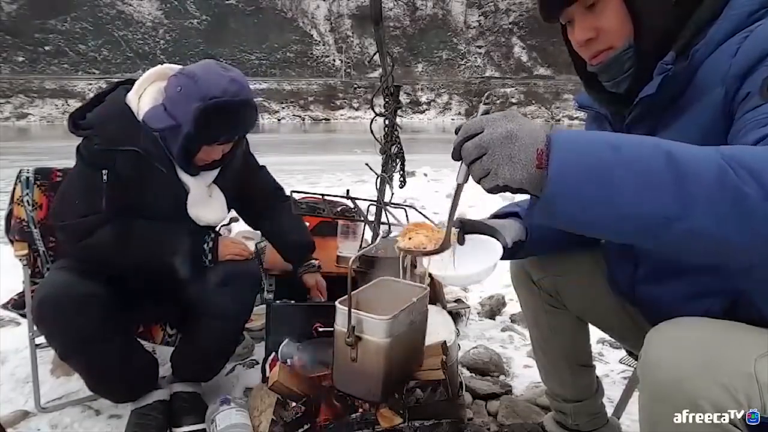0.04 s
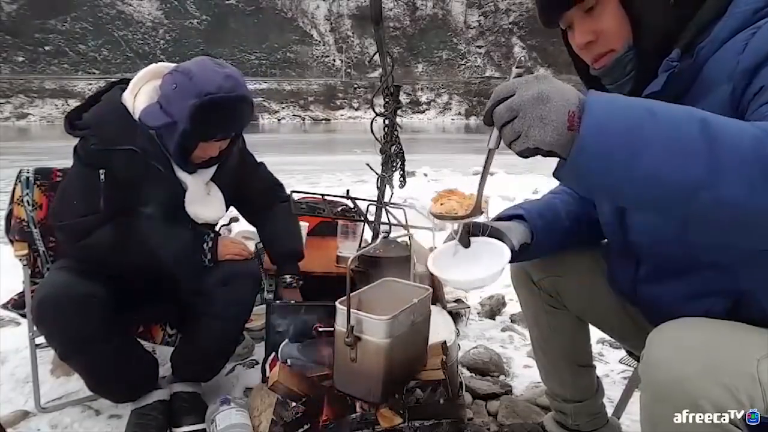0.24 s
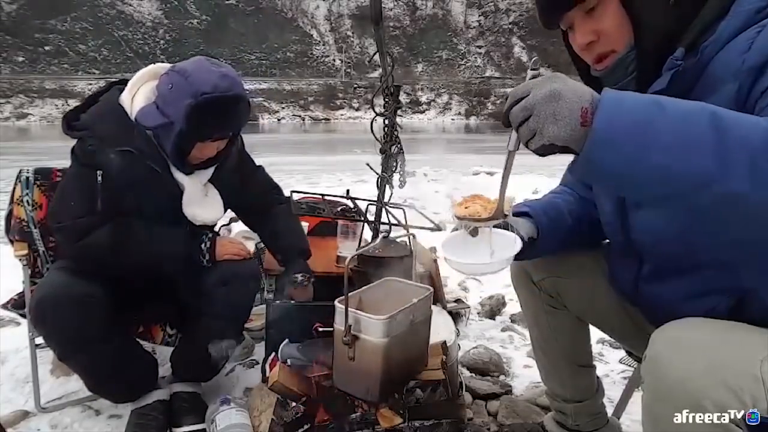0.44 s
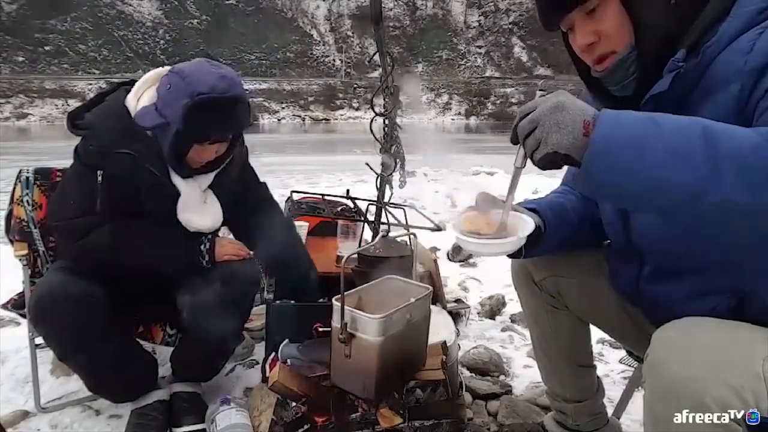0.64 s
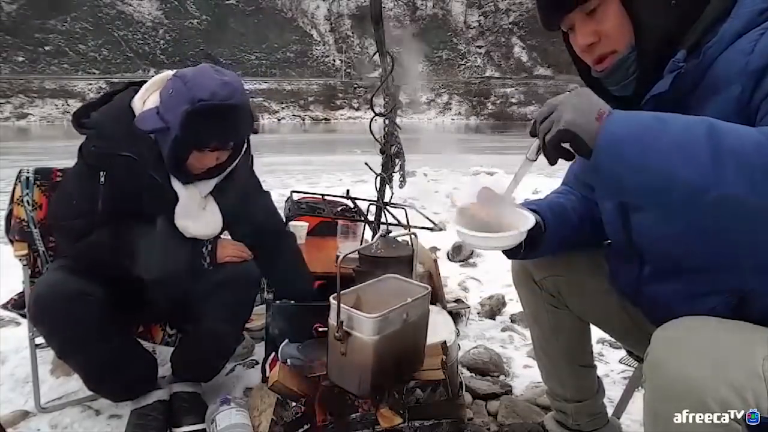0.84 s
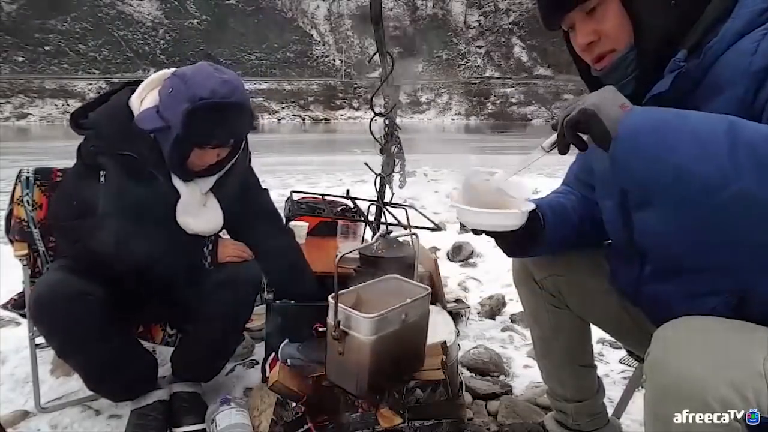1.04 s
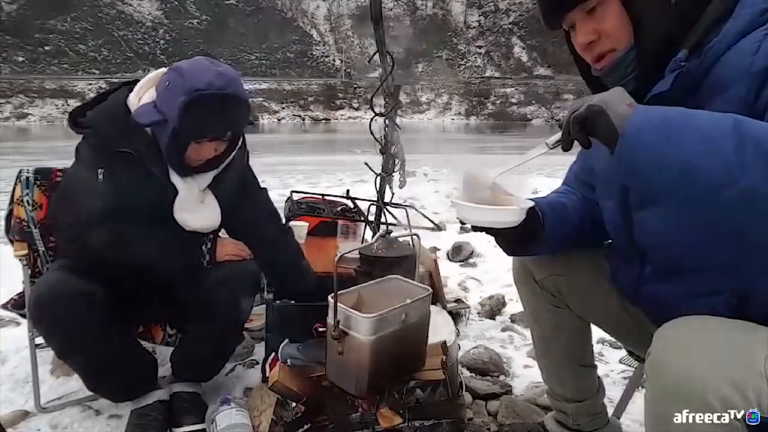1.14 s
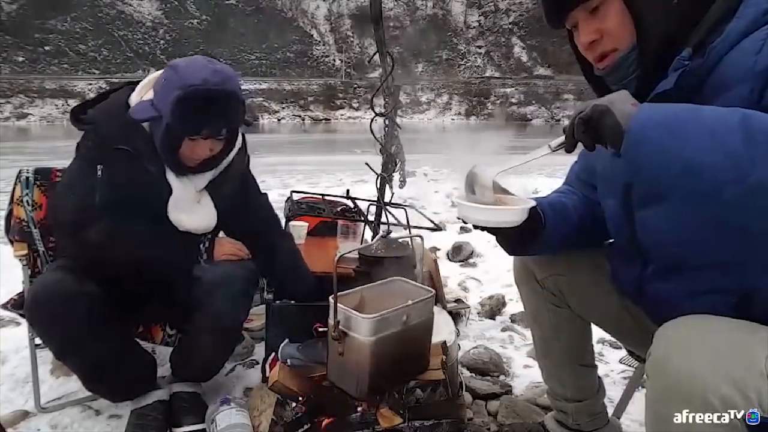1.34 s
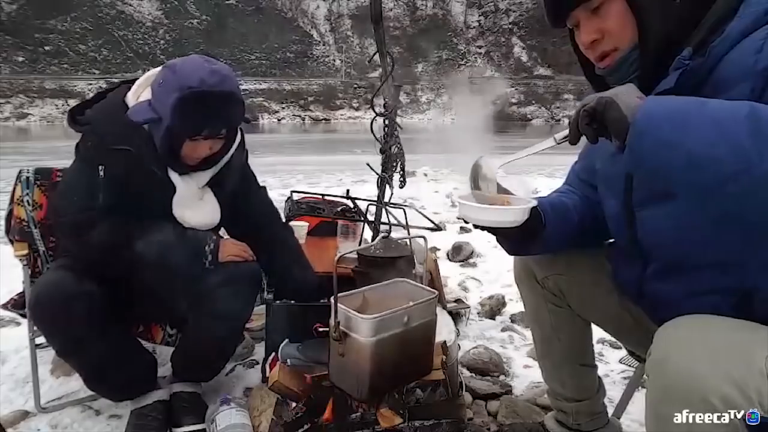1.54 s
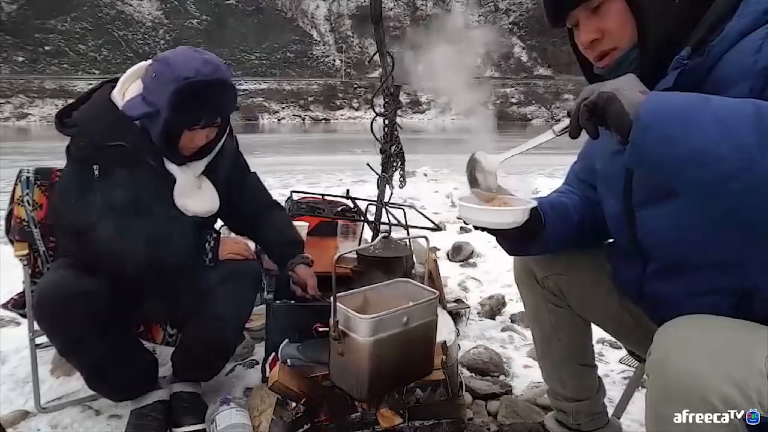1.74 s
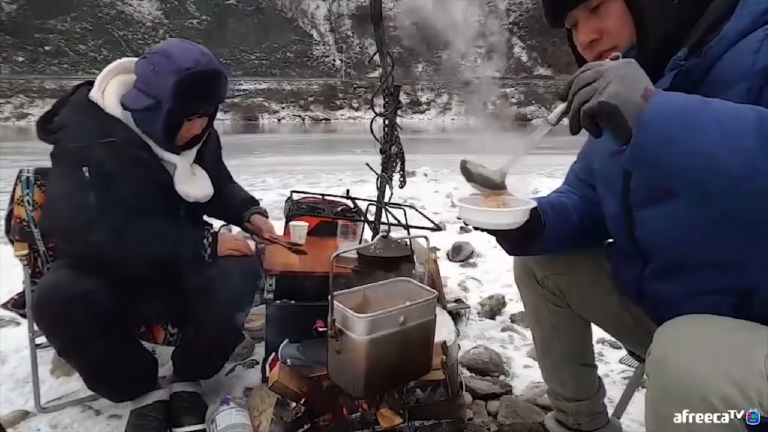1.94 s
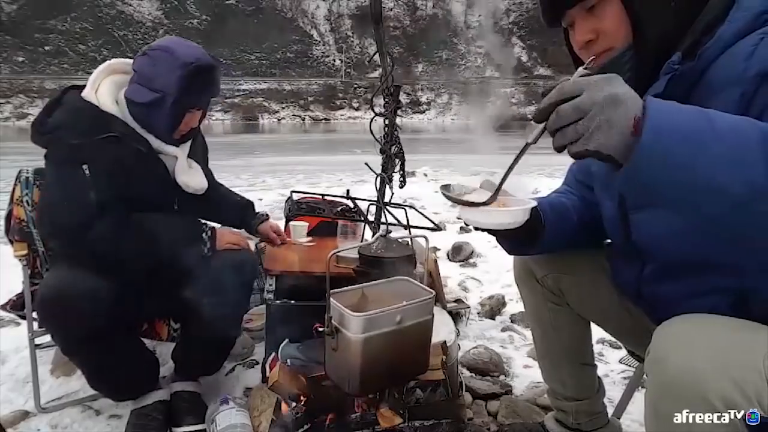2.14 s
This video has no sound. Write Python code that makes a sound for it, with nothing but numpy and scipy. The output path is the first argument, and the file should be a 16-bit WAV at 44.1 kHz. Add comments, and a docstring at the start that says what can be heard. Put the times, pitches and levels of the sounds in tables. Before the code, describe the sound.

Hollow knocks, short scrapes and a clink of a ladle serving food by a campfire.

```python
"""Hollow knocks boom and rattle over a faint, dying metal ring: food is served beside a camp fire.
Each knock sets the vessel vibrating in its damped normal modes. A metal ladle scrapes in short strokes,
its stick-slip friction driving the metal and the hollow beneath it, and ends on a bouncing clink.
The fire snaps now and then over a low rumble and a soft hiss, all close by in the open air."""
import sys
import numpy as np
from scipy import signal
from scipy.fft import rfft, irfft
from scipy.io import wavfile

SR = 44100
rng = np.random.default_rng(int(sys.argv[2]) if len(sys.argv) > 2 else 0)


def put_to_file(sound):
    """Save the sound as 16-bit audio at rate SR, in the file named by the first command-line argument."""
    columns = np.atleast_2d(sound).T  # one column per channel
    safe = np.clip(columns, -1, 1)
    whole_steps = np.round(safe * 32767)
    wavfile.write(sys.argv[1], SR, whole_steps.astype(np.int16))


N = 97020
T = np.arange(N) / SR
IMPACT_RISE_S = .0003

# blows on the vessel: t/s, boom level/dB, boom f/Hz, initial pitch excess/fraction of f, swell/s,
# boom t60/s, wall level/dB, crack level/dB, rattle level/dB, rattle hold/s
VESSEL_KNOCKS = [(0.2295, -8.5, 143.5, 0.066, 0.0064, 0.19, -10, -16.5, -21, 0.057),
                 (.317, -15.5, 153, 0.037, 0.0083, 0.1, -69, -45, -74, 0.015),
                 (0.4376, -12.5, 159.5, 0.033, 0.0038, 0.23, -34.5, -25.5, -39, 0.016),
                 (0.5802, -21, 125, 0.22, 0.0023, 0.15, -35, -31.5, -32, 0.014),
                 (.6175, -23, 156.7, 0.013, 0.0083, 0.17, -37, -51, -45.5, 0.016),
                 (1.053, -10, 127.3, 0.44, 0.0085, 0.17, -29.5, -31, -21.5, 0.028),
                 (1.517, -26, 155, 0.079, 0.0029, 0.068, -37.5, -58, -36, 0.023)]
# normal modes of the vessel wall: f/Hz, level/dB, t60/s
WALL_MODES = [(84, -18.5, 0.36), (166, -17, 0.2), (243.2, 4, 0.21), (312.2, -7, 0.28), (429.2, -7.5, 0.29),
              (494, -25, 0.05), (581, -9, 0.26), (655, -6, .18), (766, -3, 0.24), (848, -11.5, 0.19),
              (1245, -19, 0.25), (1770, -34.5, 0.12)]
# spectral densities of a knock's crack and of its dull rattle: f/Hz, level/dB
CRACK_SPECTRUM = [(150, -21), (500, 8.5), (1000, -5.5), (2000, -7.5), (3500, -7), (6000, -12.5),
                  (9500, -20.5)]
RATTLE_SPECTRUM = [(50, -13), (100, 8), (200, -2.5), (480, 3.5), (800, -2), (1300, -10), (2500, -17),
                   (5000, -25.5), (9500, -42.5)]


def knocks():
    """Impulse response: a blow cracks, rattles and excites the wall modes and a boom that sags in pitch."""
    sag_s, wall_swell_s = 0.02, 0.017
    tick_hz, tick_over_crack_db, tick_t60 = 2800, 8.5, 0.0019
    crack = colour(grit(), CRACK_SPECTRUM)
    rattle = colour(grit(), RATTLE_SPECTRUM)
    out = 0
    for start, boom_db, hz, excess, swell, t60, wall_db, crack_db, rattle_db, hold in VESSEL_KNOCKS:
        age = np.maximum(T - start, 0)
        phase = 2 * np.pi * hz * (age + excess * sag_s * (1 - np.exp(-age / sag_s)))
        boom = np.sin(phase) + from_db(-13) * np.sin(0.606 * phase)  # with a second, deeper mode
        out += from_db(boom_db) * boom * envelope(start, swell, t60)
        out += from_db(wall_db) * struck(WALL_MODES, start) * (1 - np.exp(-age / wall_swell_s))
        out += struck([(tick_hz, crack_db + tick_over_crack_db, tick_t60)], start)
        out += from_db(crack_db) * crack * envelope(start, IMPACT_RISE_S, t60=0.078)
        out += from_db(rattle_db) * rattle * envelope(start, rise=0.0017, t60=.11, hold=hold)
    return out


# ladle strokes: peak t/s, rise/s, t60/s, hollow f/Hz, then level/dB of hollow, middle, treble and top
LADLE_STROKES = [(0.369, 0.0061, 0.11, 685, -37, -43, -43, -45.5),
                 (.704, 0.0064, 0.088, 677, -35.5, -45.5, -48.5, -56),
                 (0.719, 0.0055, 0.053, 740, -42.5, -45.5, -50, -57),
                 (.808, 0.0074, 0.089, 673, -41, -56, -56, -73),
                 (0.843, 0.023, 0.17, 810, -35.5, -40, -40, -54),
                 (0.8492, 0.001, .14, 720, -21.5, -23, -26.5, -32),
                 (0.901, 0.011, 0.31, 793, -28, -32.5, -38, -45),
                 (0.951, 0.0067, 0.029, 735, -30, -41, -33.5, -38.5),
                 (0.9994, 0.0012, 0.2, 810, -47, -32, -40.5, -43),
                 (1.042, 0.0075, .22, 755, -29, -30, -29, -41.5),
                 (1.061, 0.015, 0.15, 755, -46, -26.5, -45, -56),
                 (1.154, 0.0069, 0.096, 708, -20, -30, -30, -48),
                 (1.179, 0.0091, 0.029, 720, -58, -41, -54, -44.5),
                 (1.302, 0.006, 0.16, 721, -26, -29, -32.5, -40.5),
                 (1.332, 0.011, .12, 760, -36.5, -42.5, -70, -53),
                 (1.412, 0.021, 0.13, 733, -34, -47, -51, -71),
                 (1.466, 0.014, 0.12, 838, -40.5, -38, -44.5, -47.5),
                 (1.486, 0.015, 0.2, 790, -37, -25.5, -32, -43),
                 (1.57, 0.012, 0.085, 790, -47.5, -37, -48, -58),
                 (1.597, 0.012, 0.11, 777, -47.5, -38.5, -46, -56),
                 (1.614, 0.0027, 0.22, 800, -41.5, -35.5, -41, -56),
                 (1.667, 0.013, 0.29, 787, -64, -41, -49.5, -60),
                 (1.713, 0.028, 0.23, 810, -46.5, -46, -48, -60),
                 (1.745, 0.012, 0.19, 790, -44, -33.5, -40, -58),
                 (1.779, 0.012, 0.083, 810, -37, -50, -44, -51.5),
                 (1.815, 0.024, 0.23, 800, -79, -35, -53, -50)]
# distinct modes of the scraped metal: f/Hz, level/dB, t60/s
METAL_MODES = [(1179, -3, 0.065), (1385, -3.5, 0.024), (1734, 1.5, 0.036), (1861, 2, 0.053),
               (1885, 1, 0.079), (2544, -5, 0.013), (3036, -6, 0.06), (3530, -6, 0.048), (3610, -5, 0.023),
               (4057, -8.5, 0.018), (5160, -12.5, 0.012), (5820, -8.5, 0.012), (6240, -8, 0.009),
               (6740, -10, 0.018), (8875, -26, .02)]
# spectral densities of the metal's dense, short modes and of the dull rubbing: f/Hz, level/dB
DENSE_MODE_SPECTRUM = [(700, -7.5), (1000, -8.5), (1200, 10), (1550, 10.5), (1800, -2), (2150, -5),
                       (2550, 2), (2800, -2), (3050, -4.5), (3280, -1.5), (3550, 3), (3850, -3.5),
                       (4100, -3.5), (4650, -10.5), (6200, -9.5), (7600, -8), (8900, -4.5), (9600, -27)]
RUBBING_SPECTRUM = [(80, -12), (180, 0), (300, -4.5), (600, -12), (900, -8.5), (1400, -33)]
# middle, treble and top bands of the metal: lower f/Hz, upper f/Hz
METAL_BANDS = [(950, 2400), (2400, 4800), (4800, 10000)]


def scrapes():
    """Forced vibration: stick-slip friction drives the metal's modes and the hollow under the ladle."""
    slips = grit()
    modes = sum(from_db(db) * rubbed(slips, hz, width_hz=np.log(1000) / (np.pi * t60))
                for hz, db, t60 in METAL_MODES)
    metal = rms_one(modes) + from_db(-7) * colour(grit(), DENSE_MODE_SPECTRUM)
    metal_bands = [rms_one(band(metal, low, high)) for low, high in METAL_BANDS]
    rubbing = from_db(-10.5) * colour(grit(), RUBBING_SPECTRUM)
    out = 0
    for peak, rise, t60, hollow_hz, *levels_db in LADLE_STROKES:
        hollow = rubbed(slips, hollow_hz, width_hz=80.5) + rubbing
        pressure = envelope(peak - rise, rise, t60)
        for part, db in zip([hollow] + metal_bands, levels_db):
            out += from_db(db) * unit_energy(part * pressure) * np.linalg.norm(pressure)
    return out


# ladle contacts: t/s, ring level/dB, frequency ratio, decay time ratio, clash level/dB, clash t60/s
LADLE_CONTACTS = [(1.8206, -17, 1.14, .28, -23, 0.045), (1.8294, -17, 1, 0.91, -26, 0.18)]
# modes of the free ladle: f/Hz, level/dB, t60/s
LADLE_MODES = [(787, -8.5, 0.18), (934, -13.5, 0.095), (1135, -3, 0.075), (1280, -7, 0.059),
               (1490, -29, .09), (1694, -9.5, 0.08), (1937, 2, 0.13), (2120, -20, 0.048), (2560, -26, 0.23),
               (3090, -10, 0.042), (4420, -26, 0.21), (6160, -23.5, .05), (6790, -18, 0.2)]
# spectral density of the bright clash: f/Hz, level/dB
CLASH_SPECTRUM = [(300, -14), (700, -4), (1200, 3.5), (1700, -3.5), (2250, -6), (2800, -1), (5000, -18),
                  (6300, -14.5), (7300, -12), (8500, -40)]


def clinks():
    """Contact stiffens and damps the ladle's modes; after the bounce they ring in free vibration."""
    clash = colour(grit(), CLASH_SPECTRUM)
    out = 0
    for start, ring_db, hz_ratio, t60_ratio, clash_db, clash_t60 in LADLE_CONTACTS:
        modes = [(hz * hz_ratio, db + ring_db, t60 * t60_ratio) for hz, db, t60 in LADLE_MODES]
        out += struck(modes, start)
        out += from_db(clash_db) * clash * envelope(start, IMPACT_RISE_S, clash_t60)
    return out


# snaps of the fire: t/s, level/dB, t60/s, centre f/Hz, bandwidth/octaves
FIRE_SNAPS = [(0.6169, -24, 0.022, 1440, 0.79), (0.617, -47, 0.028, 5500, 1.0),
              (0.6556, -38, 0.011, 5500, 1.2), (1.5321, -23, 0.0044, 3500, 0.6),
              (1.5321, -22, 0.011, 7200, 0.2), (2.009, -46.5, 0.033, 3500, 1.3),
              (2.087, -47, 0.015, 2500, 1.2), (2.1199, -38, 0.034, 1850, 2.9),
              (2.1815, -51, .03, 2010, 0.42)]


def fire_snaps():
    """Transients: each snap is a heavily damped tick and a burst of band-limited noise."""
    out = 0
    for start, db, t60, hz, octaves in FIRE_SNAPS:
        edge_ratio = 2 ** (octaves / 2)
        burst = rms_one(band(rng.standard_normal(N), hz / edge_ratio, hz * edge_ratio, order=1))
        tick = struck([(hz, 2.5, 3.4 / hz)], start)  # dies within 3.4 cycles
        out += from_db(db) * (burst * envelope(start, IMPACT_RISE_S, t60) + tick)
    return out


# course of the hiss: t/s, level/dB
HISS_LEVELS = [(0, -56), (.225, -61), (.26, -37.5), (.37, -41), (.5, -46), (.76, -46.5), (1.25, -47),
               (1.9, -50.5), (2.05, -48.5), (2.2, -53.5)]
# spectral densities of the hiss, the rumble and the rumble's slow swings in level: f/Hz, level/dB
HISS_SPECTRUM = [(150, 8), (300, 4.5), (900, -2.5), (1600, -5.5), (3200, -7.5), (5000, -12.5), (9500, -17)]
RUMBLE_SPECTRUM = [(20, -24.5), (45, -0.5), (70, 3), (120, 0.5), (180, -7), (260, -18.5), (500, -22),
                   (780, -19), (1100, -29), (3000, -43.5)]
WAVER_SPECTRUM = [(1, 17), (8, -4), (20, -23.5), (50, -30), (200, -85.5)]


def fire_noise():
    """Amplitude-modulated broadband noise: the fire's finely grained hiss and wavering rumble."""
    hiss_db = np.interp(T, *np.transpose(HISS_LEVELS))
    hiss = colour(rng.standard_normal(N) + 0.36 * grit(), HISS_SPECTRUM)
    rumble_db = -44.5 + 3 * colour(rng.standard_normal(N), WAVER_SPECTRUM)
    rumble = colour(rng.standard_normal(N), RUMBLE_SPECTRUM)
    return from_db(hiss_db) * hiss + from_db(rumble_db) * rumble


# modes of the faint opening ring: f/Hz, level/dB, t60/s
FAINT_MODES = [(790, -59, 1.2), (1380, -61.5, 0.99), (2030, -59, 3.1), (3000, -56, 0.18)]


def faint_ring():
    """Free decay: metal rings faintly at the start and is soon damped."""
    return struck(FAINT_MODES, 0) * envelope(0, rise=.002, t60=.1, hold=0.15)


def struck(modes, start):
    """Modal superposition: one blow starts damped sinusoids of alternating sign."""
    age = np.maximum(T - start, 0)
    return sum((-1) ** k * from_db(db - 60 * age / t60) * np.sin(2 * np.pi * hz * age)
               for k, (hz, db, t60) in enumerate(modes))


def rubbed(slips, hz, width_hz, steadiness=0.45):
    """Randomly driven resonance: the phase wanders while the amplitude is partly evened out; rms 1."""
    resonance = band(slips, hz - width_hz / 2, hz + width_hz / 2, order=1)
    analytic = signal.hilbert(band(resonance, hz - 2 * width_hz, hz + 2 * width_hz, order=1))
    return rms_one(analytic.real / (np.abs(analytic) + 1e-9) ** steadiness)


def grit(slips_per_s=5000, spread_db=2):
    """Shot noise: dense tiny slips of uneven size at random instants; rms 1."""
    sizes = from_db(spread_db * np.minimum(rng.exponential(1, N), 4))
    signs = rng.choice([-1, 1], N)
    return rms_one(sizes * signs * (rng.random(N) < slips_per_s / SR))


def envelope(start, rise, t60, hold=0):
    """Exponential decay after a linear rise and a hold."""
    decay_db = -60 * np.clip((T - start - rise - hold) / t60, 0, 4)
    return np.clip((T - start) / rise, 0, 1) * from_db(decay_db)


def colour(x, spectrum):
    """Spectral shaping by a gain curve interpolated over log frequency; rms 1."""
    hz, db = np.transpose(spectrum)
    bins_hz = np.maximum(np.arange(N // 2 + 1) * SR / N, 1)
    gain = from_db(np.interp(np.log(bins_hz), np.log(hz), db))
    return rms_one(irfft(rfft(x) * gain, N))


def band(x, low_hz, high_hz, order=3):
    """Causal band-pass filtering."""
    edges_hz = [max(low_hz, 20), min(high_hz, .45 * SR)]
    return signal.sosfilt(signal.butter(order, edges_hz, "band", fs=SR, output="sos"), x)


def from_db(db):
    """Amplitude ratio of a level in decibels."""
    return 10 ** (np.asarray(db) / 20)


def rms_one(x):
    """Normalisation to unit mean power."""
    return x / np.sqrt(np.mean(x ** 2) + 1e-20)


def unit_energy(x):
    """Normalisation to unit total energy."""
    return x / np.sqrt(np.sum(x ** 2) + 1e-20)


def scene():
    """Superposition in a free field: the sources add without reflections, in one channel."""
    return (knocks() + scrapes() + clinks() + fire_snaps() + fire_noise() + faint_ring())[None]


def record(dry):
    """Band limiting: a steep elliptic low-pass removes the highest treble."""
    cutoff_hz = 9500
    return signal.sosfilt(signal.ellip(12, .3, 80, cutoff_hz, fs=SR, output="sos"), dry)


dry = scene()
out = record(dry)
put_to_file(out)
```